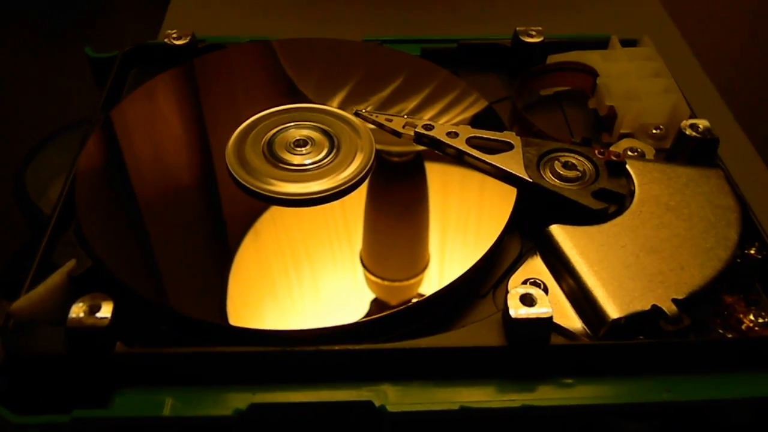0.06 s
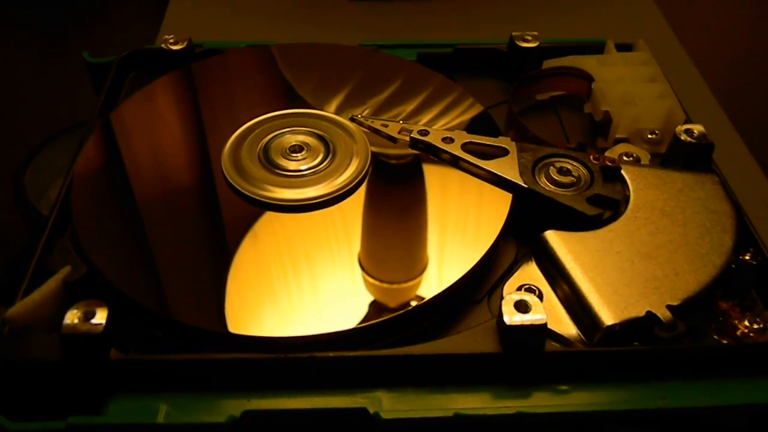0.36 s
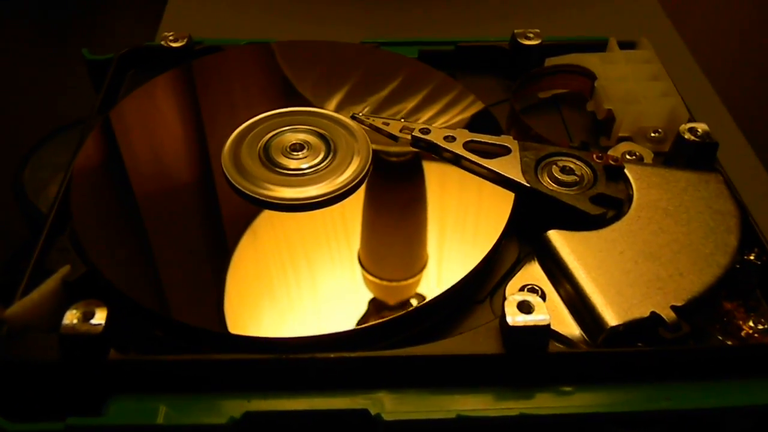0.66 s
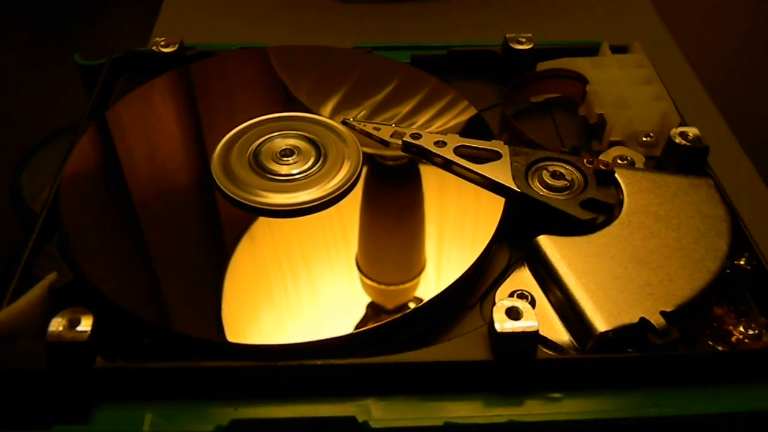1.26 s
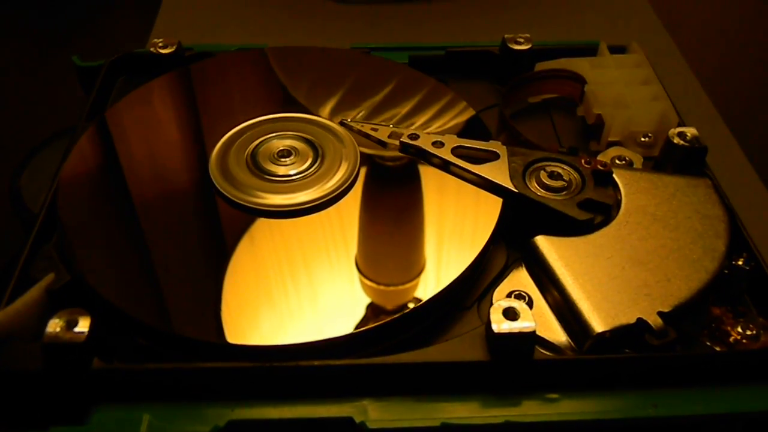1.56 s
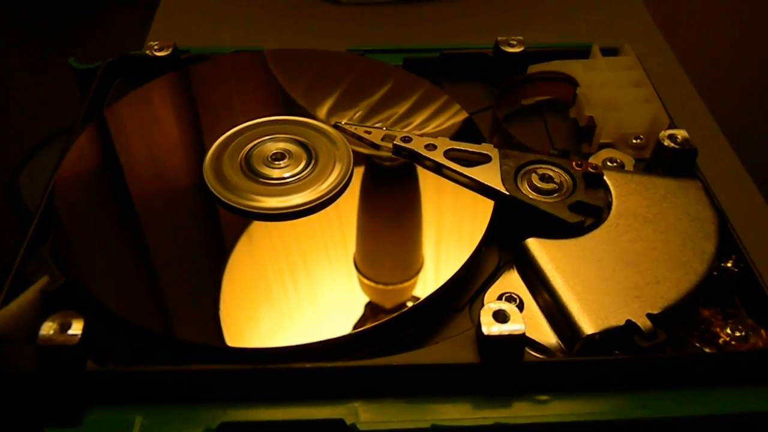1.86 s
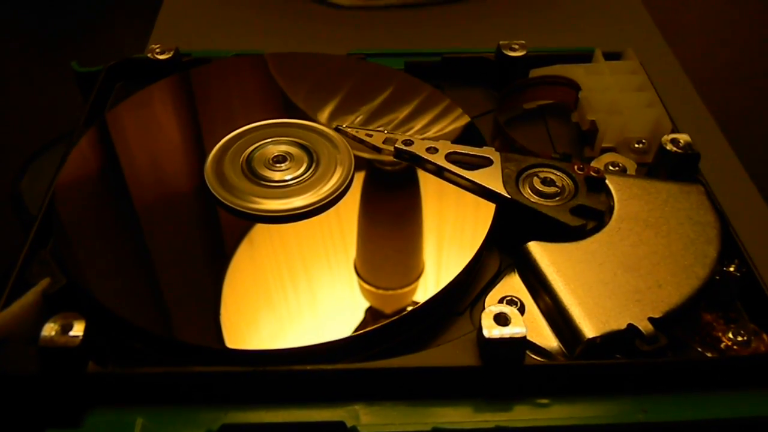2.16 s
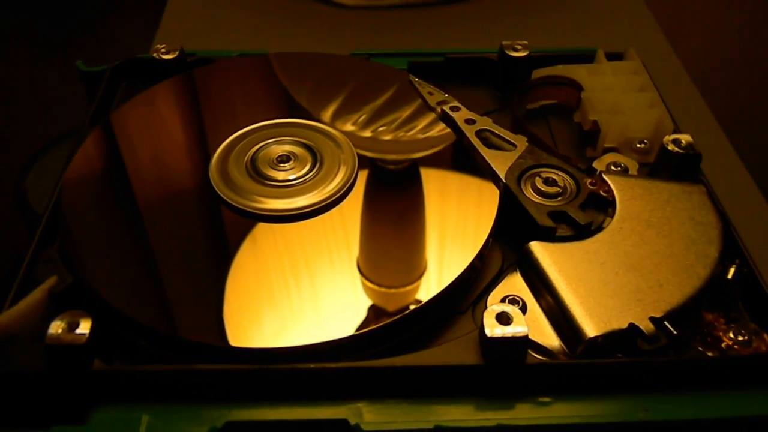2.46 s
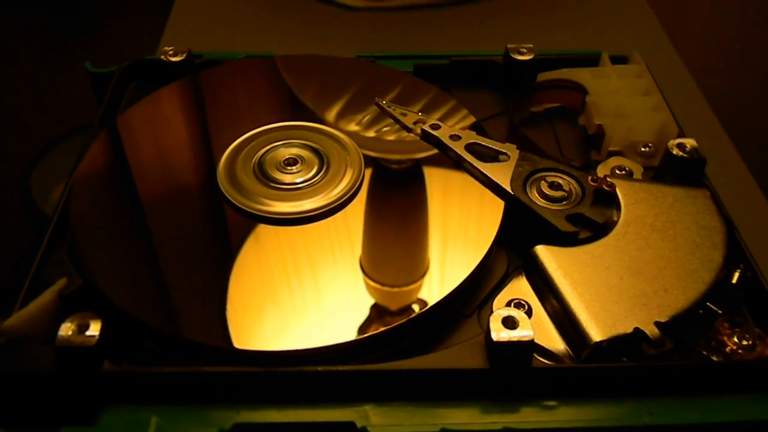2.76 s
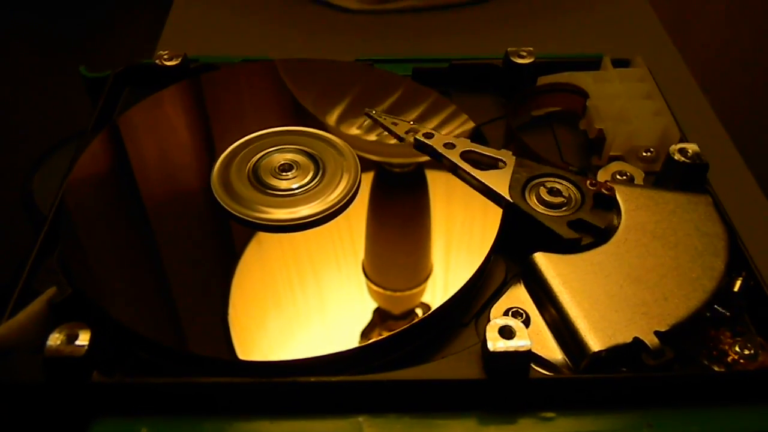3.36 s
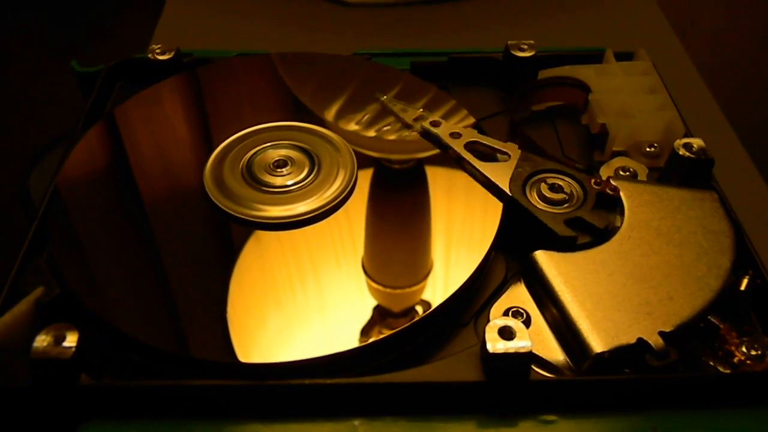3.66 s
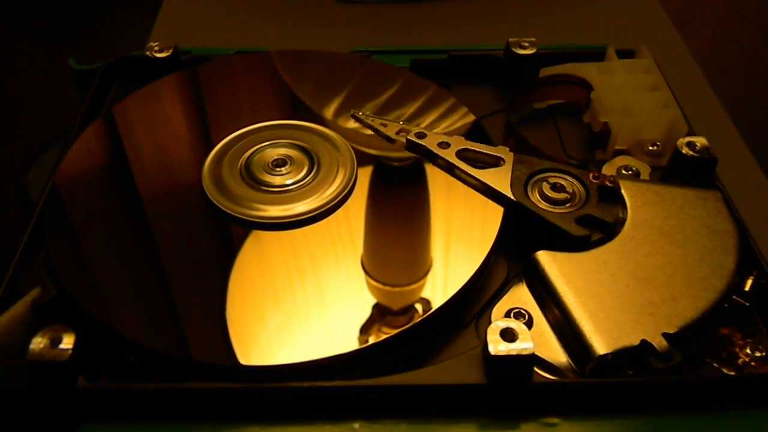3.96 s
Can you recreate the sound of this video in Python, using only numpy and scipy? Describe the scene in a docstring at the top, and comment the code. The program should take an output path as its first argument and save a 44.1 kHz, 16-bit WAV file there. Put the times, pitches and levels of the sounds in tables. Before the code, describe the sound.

A hard drive spins up with a rising whine, three clacks and quick ticking.

```python
"""A whir and a rising whine: an open hard drive spins up on its ball bearings and holds its speed.
The read arm knocks against its stop three times and rattles, then ticks across the platter in
quick seeks, each kick ringing its modes. It sings faintly while it holds a track.
The drive sits close to the right of a stereo microphone in a small room with a low hum."""
import sys
import numpy as np
from scipy import signal
from scipy.fft import rfft, irfft
from scipy.io import wavfile
from scipy.ndimage import uniform_filter1d

SR = 44100
rng = np.random.default_rng(int(sys.argv[2]) if len(sys.argv) > 2 else 0)


def master(y):
    """Save y as 16-bit WAV."""
    cut = np.clip(np.atleast_2d(y).T, -1, 1)
    pcm = np.round(cut * 32767)  # scale
    wavfile.write(sys.argv[1], SR, pcm.astype(np.int16))


N = 176400
T, HZ = np.arange(N) / SR, np.fft.rfftfreq(N, 1 / SR)

# Panning of the steady sounds. Each row: frequency in Hz, left level against right in dB.
STEADY_PAN = [(60, 0), (200, 1.5), (800, 2), (1200, -5.5), (1800, -6.5), (2750, -16), (4200, -10.5),
              (6400, -12), (8400, -5.5), (9800, 2), (15000, 2)]
# Panning of the arm, with the same columns.
ARM_PAN = [(700, 4), (1200, -6.5), (2000, -1.5), (4000, -28), (7000, -7), (10000, 1)]
# Phase between the channels. Each row: frequency in Hz, lead of the left in radians.
LEFT_PHASE = [(60, 1.5), (170, -0.3), (300, 1.5), (500, 2.5), (1100, 2), (2500, 1.41), (6000, 1.75),
              (8500, 2), (11000, 2.5)]


def amp(db):
    """Decibels to gain."""
    return 10 ** (np.asarray(db) / 20)


def curve(points, hz=HZ):
    """Interpolates a table on a log-frequency axis."""
    f, value = np.transpose(points)
    return np.interp(np.log(hz + 1), np.log(f + 1), value)


def drift(rate_hz):
    """Smooth random motion of rms 1."""
    x = irfft(rfft(rng.standard_normal(N)) / (1 + (HZ / rate_hz) ** 4), N)
    return x / x.std()


def wavering(hz, waver):
    """A complex tone, unsteady in level and phase; its real part has rms 1."""
    turns = np.cumsum(hz * np.ones(N)) / SR
    unsteady = 1 + waver * (drift(rate_hz=20) + 1j * drift(rate_hz=20))
    return np.exp(2j * np.pi * turns) * unsteady * np.sqrt(2 / (1 + 2 * waver ** 2))


def impulses(rows):
    """One impulse for each pair of time in seconds and level in dB."""
    x = np.zeros(N)
    for start, db in rows:
        x[min(round(start * SR), N - 1)] += amp(db)
    return x


def ring(pitches, modes):
    """Spectrum of struck modes of alternating sign."""
    t = T[:SR // 4]
    partials = ((-1) ** k * amp(db - 60 * t / t60) * np.sin(2 * np.pi * pitches[k] * t)
                for k, (db, t60) in enumerate(modes))
    return rfft(sum(partials), N)


def burst(t60):
    """Spectrum of many close modes dying together, energy 1."""
    x = rng.standard_normal(N) * 1000. ** (-T / t60)
    return rfft(x / np.linalg.norm(x))


def stereo(spectrum, pan):
    """Turns a near source's spectrum into left and right signals."""
    left = spectrum * amp(curve(pan)) * np.exp(1j * curve(LEFT_PHASE))
    return irfft(np.array([left, spectrum]), N)


def noise(colour, ripple_db):
    """Steady stereo noise with a fine ripple of resonances."""
    # Likeness of the channels. Each row: frequency in Hz, coherence from 0 to 1.
    coherence = [(60, 0.89), (170, 0.72), (300, 0.96), (600, 0.74), (3000, 1), (12000, 0.91)]
    alike = np.clip(curve(coherence), 0, 1)
    right, unrelated = rfft(rng.standard_normal((2, N)))
    ripple = uniform_filter1d(rng.standard_normal(len(HZ)), size=200)
    gain = amp(curve(colour) + ripple_db * ripple / ripple.std()) * np.sqrt(SR / 2)
    left = alike * right * np.exp(1j * curve(LEFT_PHASE)) + np.sqrt(1 - alike ** 2) * unrelated
    return irfft(gain * np.array([left * amp(curve(STEADY_PAN)), right]), N)


def spindle():
    """Bearing noise grows with speed; the motor's whine drops once the speed locks."""
    # Whir of bearings and platter. Each row: frequency in Hz, noise density in dB.
    whir_colour = [(30, -120), (330, -82.5), (410, -66), (600, -72), (950, -71.5), (1500, -71.5),
                   (2000, -67.5), (2550, -63), (2850, -67), (3300, -63), (3650, -71.5), (3950, -66),
                   (4600, -71.5), (5200, -76), (6650, -75.5), (7000, -82), (8200, -85), (10000, -102),
                   (16000, -113)]
    # Bearing tones: multiples of the spindle speed, and their levels at full speed in dB.
    bearing_orders = [24.2, 25.86, 28.55, 29.035, 33.97, 35.18, 43.56, 48.39, 53.24, 62.82, 64.06, 72.59]
    bearing_db = [-48, -47.5, -42, -36.5, -42.5, -42.5, -39, -48, -48, -51, -54, -51.5]
    # Motor tones: multiples of the speed, and full-current levels in dB before the chassis lifts them.
    motor_orders = [48, 96, 120, 144]
    motor_db = [-46.5, -65, -69, -70]
    start_hz, free_hz, lock_hz, time_constant_s = 70, 121, 90.33, 1.55
    speed = np.minimum(free_hz - (free_hz - start_hz) * np.exp(-T / time_constant_s), lock_hz)
    locked = uniform_filter1d(1. * (speed >= lock_hz), size=3000)
    current = amp(-37 * locked)
    whir = noise(whir_colour, ripple_db=2.08) * (1 + 0.075 * drift(rate_hz=71.5))
    bearings = sum(amp(db) * whine(speed, order, waver=0.35) / chassis(order * lock_hz)
                   for order, db in zip(bearing_orders, bearing_db))
    motor = sum(amp(db) * whine(speed, order, waver=0.3) for order, db in zip(motor_orders, motor_db))
    return (whir + bearings) * (speed / lock_hz) ** 1.45 + current * motor


def whine(speed, order, waver):
    """A wavering stereo tone tied to the spindle, swelling once a turn."""
    hz = order * speed
    wobble = 1 + 0.21 * np.cos(2 * np.pi * np.cumsum(speed) / SR)
    right = wavering(hz, waver) * chassis(hz) * wobble
    left = right * amp(curve(STEADY_PAN, hz)) * np.exp(1j * curve(LEFT_PHASE, hz))
    return np.array([left, right]).real


def chassis(hz):
    """Gain of the chassis, whose resonances lift a tone gliding through them."""
    # Each row: centre in Hz, width in Hz, boost in dB.
    resonances = [(2630, 450, 13.5), (3180, 270, 15), (3916, 340, 10), (5460, 390, 5), (8420, 1300, 14.5),
                  (9360, 750, 14), (11450, 1000, 13)]
    return amp(sum(db / (1 + (2 * (hz - centre) / width) ** 2) for centre, width, db in resonances))


def knocks():
    """The arm hits its stop: a bending wave crosses the casting, treble first, and rings briefly."""
    # Three double hits. Each row: start in seconds, strength in dB.
    hits = [(1.3962, -2.5), (1.3985, -14), (1.4897, -2.5), (1.4930, -7), (2.2845, -1.5), (2.2868, -11)]
    # Colour of the clack. Each row: frequency in Hz, gain in dB.
    clack_colour = [(100, -12), (450, 11), (850, 9), (1150, 16.5), (1450, 25.5), (1750, 1), (2050, 15),
                    (2700, 8.5), (3300, 21), (4000, 20), (5150, 24), (5650, 11), (6200, 7), (6900, 19),
                    (7600, 6.5), (9700, 3.5), (10400, -3), (16000, -8)]
    # Ringing pitches in Hz, then their modes. Each row: level in dB, t60 in seconds.
    pitches = [1242, 1480, 4060, 5075, 5376]
    modes = [(-25, .04), (-23, 0.056), (-20, 0.033), (-19, 0.022), (-12, 0.048)]
    # Each row: frequency in Hz, left level against right in dB.
    pan = [(500, -4), (1200, -2.5), (2500, -8), (5000, -21), (7000, -14), (9500, -5.5), (15000, 5.5)]
    travel_1khz_s, fastest_hz = 0.00362, 8200
    slowness = np.sqrt(1000 / np.maximum(HZ, 500))
    lag_s = travel_1khz_s * np.maximum(slowness - np.sqrt(1000 / fastest_hz), 0)
    blows = rfft(impulses(hits)) * np.exp(-2j * np.pi * np.cumsum(lag_s) * SR / N)
    clack = amp(curve(clack_colour)) * (1 + amp(1.5) * burst(t60=0.015))
    return stereo(blows * (clack + ring(pitches, modes)), pan)


def arm_kicks():
    """Jolts to the arm: rebounds, small track-to-track steps, and a start and a brake for each seek."""
    # The rattle after the knocks. Each row: start in seconds, strength in dB.
    rebounds = [(1.4105, 6), (1.423, 3.5), (1.4305, 2.5), (1.511, -3), (2.2985, 7.5), (2.3115, -1),
                (2.3215, 4), (2.3475, 4)]
    # Each row: start in seconds, strength in dB, seconds until the arm brakes.
    seeks = [(2.437, 0, 0.0061), (2.449, 3, .003), (2.4602, 3.5, .0077), (2.473, -5, .003),
             (2.615, -4, 0.013), (2.644, 1.5, 0.01), (2.67, -3.5, 0.0047), (2.686, -1.5, .011),
             (2.704, -1, 0.008), (2.719, -1.5, 0.0067), (2.731, 0, 0.0063), (2.756, -3, .011),
             (2.863, 1.5, 0.01), (2.876, -7, 0.0061), (2.903, -6, 0.0074), (2.938, -6, 0.0049),
             (2.975, -4.5, 0.0071), (3.008, -5, .006), (3.037, 1, .0085), (3.052, -0.5, 0.0038),
             (3.087, 2, 0.0046), (3.103, -2, 0.0071), (3.1207, 2, .0046), (3.156, 1, 0.0074),
             (3.192, -0.5, 0.0045), (3.2298, 0.5, 0.0056), (3.2645, 1.5, 0.0038), (3.301, -0.5, 0.0054),
             (3.3373, -1.5, .0036), (3.374, -1.5, .0078), (3.409, -1.5, 0.0053), (3.447, 0, 0.0037),
             (3.4813, 1, 0.0086), (3.499, 1, 0.006), (3.522, -1, .0057), (3.540, -3, .0062),
             (3.56, 1, 0.0057), (3.5922, 0.5, .0036), (3.605, 3.5, .015), (3.6518, 2.5, 0.0042),
             (3.667, -8, 0.0078), (3.7014, -0.5, 0.0064), (3.725, -3, 0.004), (3.746, 0, 0.005),
             (3.766, 0, 0.0075), (3.791, -4, 0.0046), (3.81, -1, 0.0041), (3.828, -2, 0.0063),
             (3.848, -2.5, 0.0067), (3.882, 1.5, 0.0041), (3.919, 4, 0.0059), (3.9576, 2, 0.0076)]
    steps_from_s, steps_per_s, brake_db = 2.3, 160, -3
    steps = amp(-13) * rng.standard_normal(N) * (rng.random(N) < steps_per_s / SR)
    kicks = impulses(rebounds) + steps * (T > steps_from_s)
    for start, db, length in seeks:
        brake_s = start + length + 0.00012 * rng.standard_normal()
        kicks += impulses([(start, db)]) - impulses([(brake_s, db + brake_db)])
    return kicks


def arm():
    """Strokes and buzz: each kick ticks and rings the arm; wide swings flex it and keep it buzzing."""
    # Modes of the arm and of its flexing. Each row: level in dB, t60 in seconds.
    arm_modes = [(-52.5, 0.079), (-39, 0.016), (-36.5, 0.06), (-34.5, 0.036), (-28, 0.04), (-32.5, 0.028),
                 (-46, 0.02), (-38, 0.034)]
    flex_modes = [(-29, 0.042), (-26.5, 0.025), (-35, 0.045)]
    arm_hz, flex_hz = [177, 660, 975, 1157, 1415, 1520, 2500, 3100], [4060, 4750, 5300]
    # Spells with their own depth of flex. Each row: start and end in seconds, flex gain in dB.
    swings = [(1.4, 2.4, -3), (2.456, 2.48, 1.5), (2.608, 2.74, 0), (3.07, 3.2, -3.5), (3.485, 3.66, -10),
              (3.875, 3.96, -5)]
    # Colour of the dry tick. Each row: frequency in Hz, gain in dB.
    tick_colour = [(100, -17.5), (600, -5.5), (1400, 5), (2200, 4), (4500, 0), (7000, -9), (9000, -21),
                   (11000, -24), (16000, -60)]
    kicks = arm_kicks()
    flex_db = np.full(N, -9.5)
    for start, end, db in swings:
        flex_db[(T > start) & (T < end)] = db
    flex = kicks * amp(flex_db)
    buzz_t60_s = 0.051
    strain = signal.lfilter([1], [1, -np.exp(-np.log(1000) / (buzz_t60_s * SR))], abs(flex))
    buzz = amp(-29.5) * strain * wavering(hz=2022, waver=0.19).real
    variant = rng.integers(0, 4, N)  # each kick gets one of four tick textures
    ticks = sum(rfft(kicks * (variant == k)) * burst(t60=0.043) for k in range(4))
    ringing = rfft(kicks) * ring(arm_hz, arm_modes) + rfft(flex) * ring(flex_hz, flex_modes)
    strokes = ringing + ticks * amp(curve(tick_colour))
    return stereo(strokes, ARM_PAN), stereo(rfft(buzz), ARM_PAN)


def servo():
    """While the arm holds a track, constant small nudges keep it singing at a steady pitch."""
    # Each row: start and end in seconds, pitch in Hz, rms level on the right in dB.
    notes = [(2.644, 2.755, 1134, -34.5), (2.73, 2.904, 1388, -40.5), (2.876, 3.27, 1158, -40.5),
             (2.885, 3.057, 1377, -40), (3.26, 3.72, 1408, -42), (3.435, 3.682, 1146, -38),
             (3.698, 3.9, 1343, -40)]
    fade_s = 0.008
    song = np.zeros(N)
    for start, end, hz, db in notes:
        gate = np.clip(np.minimum(T - start, end - T) / fade_s, 0, 1)
        song += amp(db) * gate * wavering(hz, waver=0.4).real
    return stereo(rfft(song), ARM_PAN)


def room(send):
    """The small room's short diffuse tail, different in each channel and softer on the left."""
    # Each row: frequency in Hz, t60 in seconds.
    decay_times = [(200, 0.15), (1500, 0.4), (5000, 0.23), (12000, 0.23)]
    predelay_s, left_db = 0.004, -7.5
    hz, t, bands = signal.stft(rng.standard_normal((2, SR // 2)), SR, nperseg=256)
    decay = amp(-60 * t / curve(decay_times, hz)[:, None]) * (t > predelay_s)
    tail = signal.istft(bands * decay, SR, nperseg=256)[1]
    tail /= np.linalg.norm(tail[0])
    return signal.fftconvolve(send[None], tail, axes=1)[:, :N] * amp([[left_db], [0]])


def hum():
    """The room's low hum: noise ringing in narrow resonances."""
    # Each row: centre in Hz, half-width in Hz, rms level in dB.
    resonances = [(131, 41, -61), (177, 5.7, -59.5)]
    drone = np.zeros(N)
    for centre, width, db in resonances:
        band = irfft(rfft(rng.standard_normal(N)) / (1 + ((HZ - centre) / width) ** 2), N)
        drone += amp(db) * band / band.std()
    return drone


def bump(at_s, hz, db, width_s):
    """One soft low bump: a sine under a bell-shaped swell."""
    t = T - at_s
    return amp(db) * np.exp(-(t / width_s) ** 2) * np.sin(2 * np.pi * hz * t)


def background():
    """Room tone with a low hum and one soft bump."""
    # Each row: frequency in Hz, noise density in dB.
    room_tone = [(22, -114), (42, -90), (68, -75.5), (100, -77), (175, -76.5), (300, -78), (600, -77.5),
                 (2000, -82), (8000, -100), (15500, -101)]
    return noise(room_tone, ripple_db=0.5) + hum() + bump(at_s=0.932, hz=130, db=-41, width_s=0.015)


def scene():
    """The drive in its room; only the knocks and the arm's strokes feed the reverb."""
    hits = knocks()
    strokes, buzz = arm()
    reverb = room(amp(-7.5) * hits[1] + amp(-7) * strokes[1])
    return spindle() + hits + strokes + buzz + reverb + servo() + background()


def record(dry):
    """A soft clip rounds off the loudest knocks, then a low-pass trims the top."""
    ceiling, cutoff_hz = 1.02, 15800
    soft = dry / (1 + (dry / ceiling) ** 4) ** (1 / 4)
    low_pass = signal.firwin(511, cutoff_hz, window=("kaiser", 9), fs=SR)
    return signal.oaconvolve(soft, low_pass[None], "same")


dry = scene()
out = record(dry)
master(out)
```